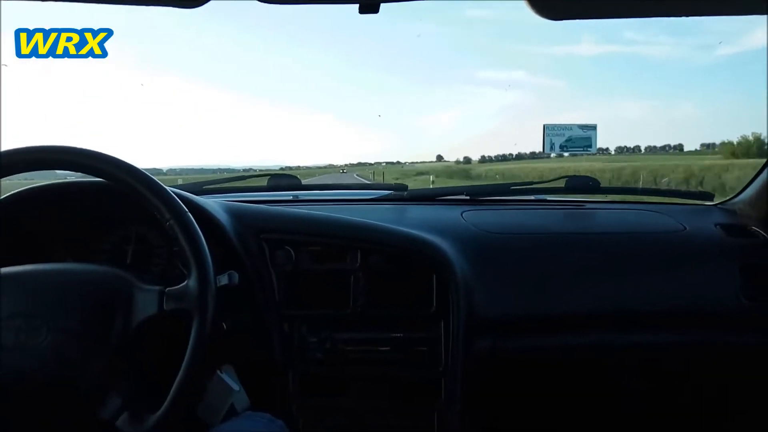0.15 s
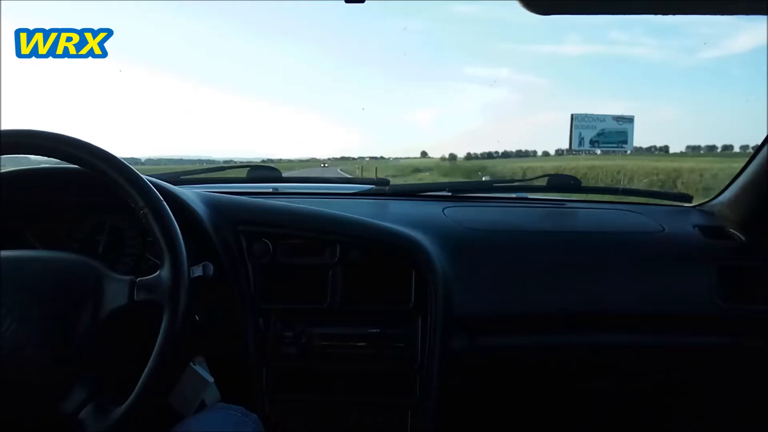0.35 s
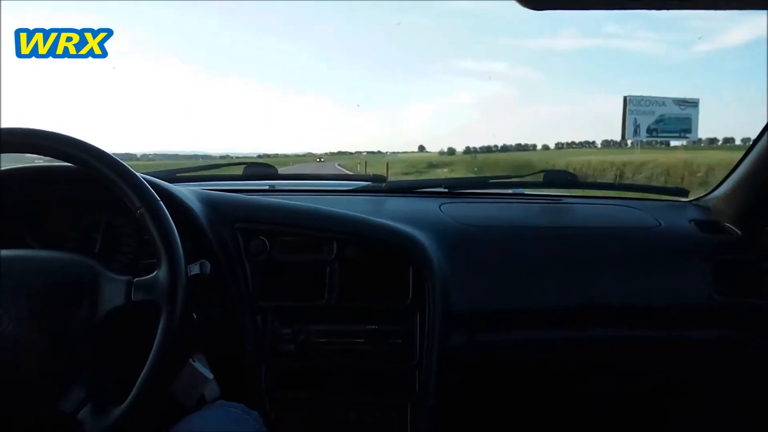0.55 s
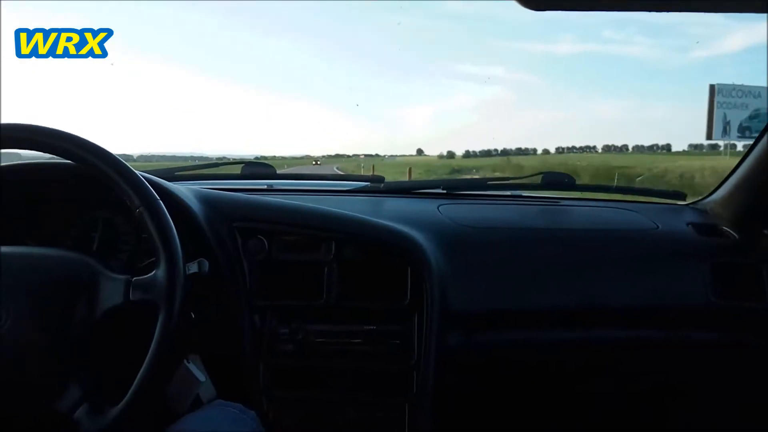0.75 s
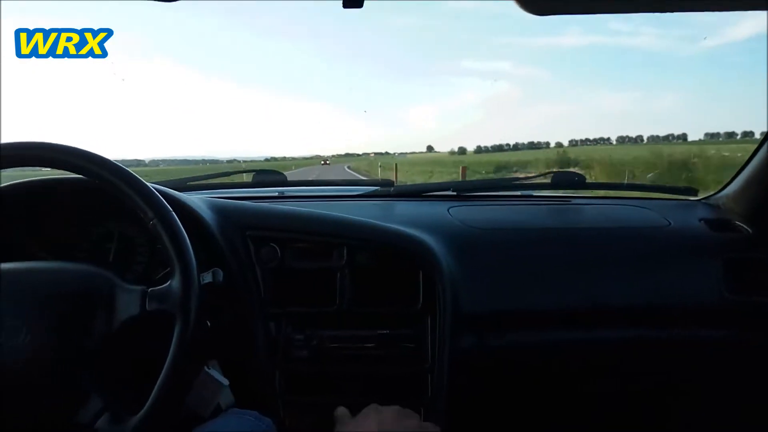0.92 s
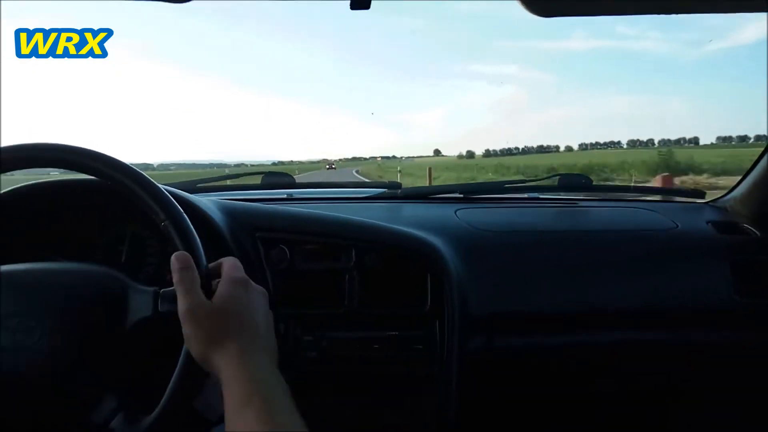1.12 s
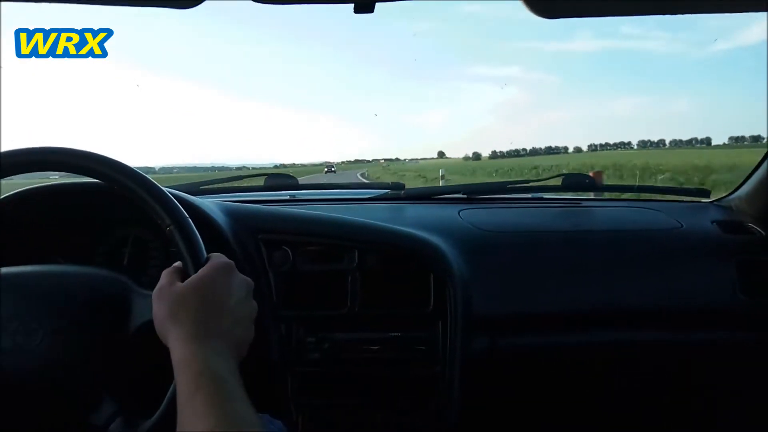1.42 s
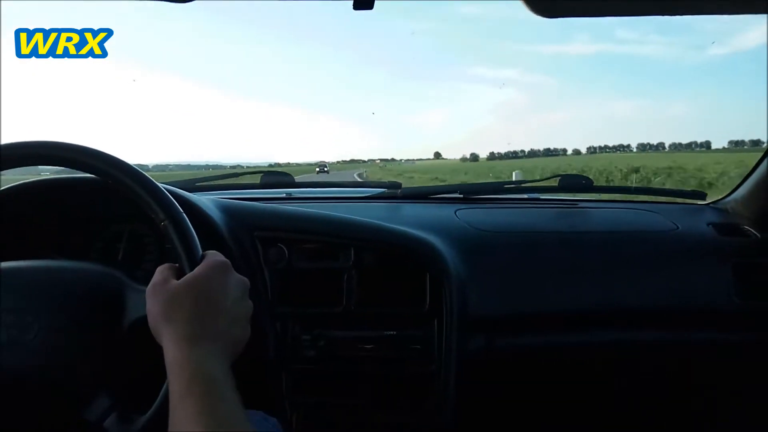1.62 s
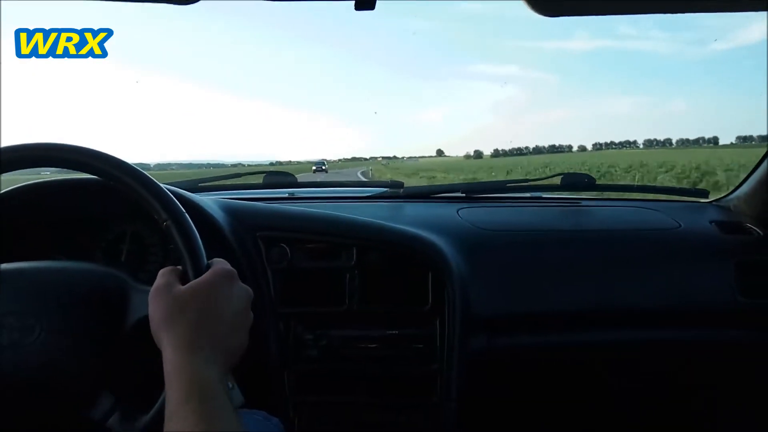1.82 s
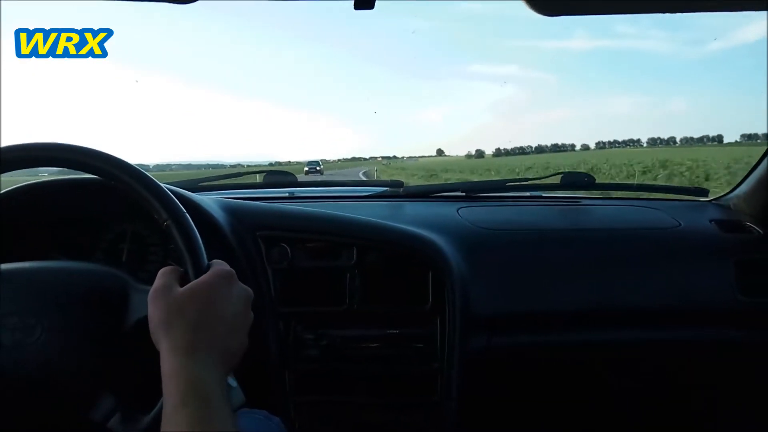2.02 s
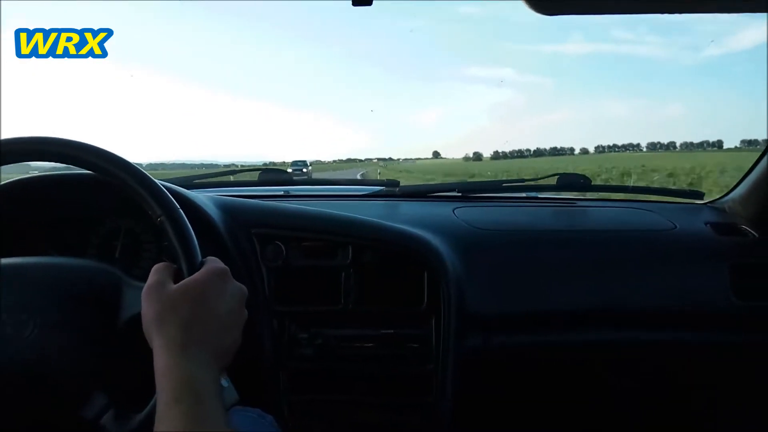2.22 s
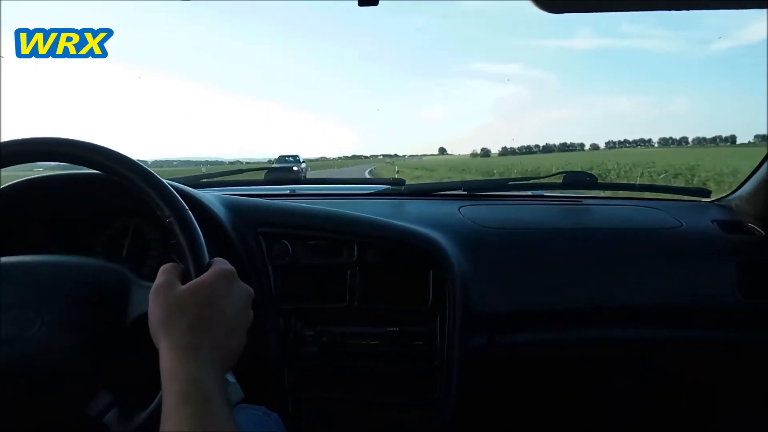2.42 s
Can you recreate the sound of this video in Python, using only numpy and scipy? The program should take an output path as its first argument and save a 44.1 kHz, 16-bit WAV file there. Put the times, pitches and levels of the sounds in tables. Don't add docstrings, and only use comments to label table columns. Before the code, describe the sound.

A turbocharged car engine drones loudly inside the cabin, cuts for a gear change with a dull thump and a short air hiss, then pulls again at a lower pitch over road rumble and faint wind.

```python
import sys
import numpy as np
from scipy import signal
from scipy.fft import rfft, irfft, next_fast_len
from scipy.io import wavfile
from scipy.ndimage import uniform_filter1d, map_coordinates

SR = 44100
rng = np.random.default_rng(int(sys.argv[2]) if len(sys.argv) > 2 else 0)


def volts_from_db(level):
    exponent = np.asarray(level, float) / 20
    return 10 ** exponent


def wav_record(signal):
    frames = np.transpose(np.atleast_2d(signal))
    bounded = np.clip(frames, -1, 1)
    quanta = np.round(bounded * 32767).astype(np.int16)
    wavfile.write(sys.argv[1], SR, quanta)


N = 112896
TIME = np.arange(N) / SR
LAG_S = 0.0004


def unit(x):
    return x / np.sqrt(np.mean(x ** 2) + 1e-20)


def along(hz, f, v):
    return np.interp(np.log(hz + 1), np.log(np.asarray(f) + 1), v)


def curves(rows):
    s, *cols = np.transpose(rows)
    return [np.interp(TIME, s, c) for c in cols]


def wobble(rate_hz):
    knots = rng.standard_normal(int(N * rate_hz / SR) + 4)
    return map_coordinates(knots, [TIME * rate_hz])


def rush(spectrum, patchy_db, peaks=(), lag_s=0):
    # (frequency [Hz], correlation [-1 to 1])
    alike = [(60, 1), (200, .92), (420, 0.74), (700, 0.51), (1000, 0.37), (1400, -0.46), (3100, 1),
             (6800, 0.19)]
    # (frequency [Hz], left minus right [dB])
    lean = [(60, 0.5), (110, -2.5), (200, -1), (380, 0), (700, -2), (1290, 4.5), (2380, -1), (4400, -0.5),
            (8120, -7), (15000, -0.5)]
    z = signal.stft(rng.standard_normal((2, N)), nperseg=512)[2]
    patches = uniform_filter1d(rng.standard_normal(z.shape[1:]), size=6, axis=0)
    patches = uniform_filter1d(patches, size=12, axis=1)
    pair = signal.istft(z * volts_from_db(patchy_db * unit(patches)), nperseg=512)[1][:, :N]

    m = next_fast_len(N + 8192)
    hz = np.fft.rfftfreq(m, 1 / SR)
    gain_db = along(hz, *np.transpose(spectrum))
    for centre_hz, width_hz, db in peaks:
        gain_db = gain_db + db / (1 + (2 * (hz - centre_hz) / width_hz) ** 2)

    late = (hz > 900) & bool(lag_s)
    direct = 0.35 / (1 + (hz / 2900) ** 8)
    likeness = np.where(late, direct, along(hz, *np.transpose(alike)))
    turn = np.arccos(np.clip(likeness, -1, 1)) / 2
    mid, side = rfft(pair, m) * [np.cos(turn), np.sin(turn)]
    tilt = volts_from_db(along(hz, *np.transpose(lean)) / 2) * np.exp(-1j * np.pi * hz * lag_s * late)
    stereo = np.array([(mid + side) * tilt, (mid - side) / tilt])
    return unit(irfft(volts_from_db(gain_db) * stereo, m)[:, :N])


def engine():
    # (time [s], firing rate [Hz], boom of the firing order [dB], throttle [0-1])
    drive = [(0, 164.4, -12, 0.99), (.45, 165.8, -10.5, 0.99), (.485, 165, -20, 0.34),
             (.55, 160.3, -21.5, 0.5), (.59, 156.4, -10, 0.2), (.66, 154.7, -14.5, 1),
             (.71, 148.6, -22.5, .1), (.77, 148, -7.5, 0.1), (.95, 136.2, -9, .05),
             (1.08, 129.9, -9.5, 0.3), (1.145, 129, -8.5, .1), (1.18, 130, -20.5, 0.31),
             (1.22, 133, -9.5, 0.67), (1.3, 131.2, -11.5, 0.82), (1.6, 131.5, -10.5, 0.88),
             (2.0, 132, -9.5, 0.93), (2.56, 132.5, -9, 0.97)]
    # (frequency [Hz], level [dB], left minus right [dB], left lead [rad])
    cabin = [(132, -1, -0.7, -0.17), (165, -9, -0.5, 0.68), (250, -11, 3.5, 0.19), (339, -10.5, -3, 0.41),
             (367, -26, -9, 0.96), (550, -12, -1.5, 0.096), (695, -19.5, 3.5, 0.85),
             (837, -31.5, -7.5, -.3), (1033, -46, 1, 0)]
    pulse = [(2, 1.3), (3, 1.4), (4, -.5), (5, 3), (6, 2.6)]
    # (order [firing rate], level at open throttle [dB])
    halves = [(.5, -29.5), (1.5, -29.5), (4.5, -37), (5.5, -38), (6.5, -45)]
    # (frequency [Hz], level [dB per Hz])
    roar_spectrum = [(120, -38), (200, 4), (330, -0.5), (600, -9), (900, -8), (1600, -25.5), (2600, -39),
                     (6000, -120)]
    hz, boom_db, throttle = curves(drive)
    shut = 1 - throttle
    turn = 2 * np.pi * np.cumsum(hz) / SR + 0.05 * wobble(30)
    f, level_db, lean_db, lead_rad = np.transpose(cabin)
    side = np.array([[0.5], [-0.5]])

    shut_db = -24 * shut
    orders = [(1, 0.0065, boom_db)]
    for k, phase in pulse:
        orders.append((k, phase, -9.5 + shut_db - 6 * (k - 2) * shut))
    tone = 0
    for k, phase, db in orders:
        heard_db = along(k * hz, f, level_db) + side * along(k * hz, f, lean_db)
        gain = volts_from_db(db + heard_db - 0.14 * wobble(25.08))
        tone = tone + gain * np.cos(k * turn + phase + side * along(k * hz, f, lead_rad))

    uneven_db = shut_db + 0.2 * (hz - 165)
    for k, db in halves:
        tone = tone + volts_from_db(uneven_db + db + 2.9 * wobble(19)) * np.cos(k * turn + side * (k - 0.5))

    roar_db = -30 - 7 * shut + 0.2417 * (hz - 132)
    gate = 1 + 0.18 * np.cos(turn)
    roar = volts_from_db(roar_db) * gate * rush(roar_spectrum, patchy_db=0.7, lag_s=-LAG_S)
    return np.sqrt(2) * tone + roar


def thump():
    start_s, level_db, boom_hz, t60_s, rise_s = 0.465, -1, 98.4, 0.15, 0.007
    t = np.clip(TIME - start_s, 0, None)
    envelope = volts_from_db(level_db - 60 * t / t60_s) * (1 - np.exp(-t / rise_s))
    return envelope * np.sin(2 * np.pi * boom_hz * t)


def valve():
    # (time [s], level [dB], attack [s], hold [s], sag [dB/s], t60 [s])
    vents = [
        (.41, -30, .1, .24, 9, .7),
        (1.25, -45, .03, .04, 10, .3),
    ]
    # (frequency [Hz], level [dB per Hz])
    vent_spectrum = [(150, -33.5), (330, -0.5), (800, -10.5), (2300, -4.5), (2550, -11.5), (5000, -13),
                     (10000, -24), (13600, -39.5)]
    # (frequency [Hz], width [Hz], level [dB])
    pipe = [(3950, 300, 4), (4550, 200, 5), (12200, 400, 1.5), (14800, 700, 16)]
    # (frequency [Hz], width [Hz], level [dB], rise [s], t60 [s], end [s])
    sings = [(2056, 320, -37, 0.18, 10, 1.17), (2220, 220, -37, 0.18, 6.6, .77),
             (4100, 770, -36.5, .11, 1.3, .8)]
    opening = 0
    for start_s, db, rise_s, hold_s, sag, t60_s in vents:
        held = TIME - start_s - rise_s
        fall_db = sag * np.clip(held, 0, hold_s) + 60 * np.clip(held - hold_s, 0, None) / t60_s
        opening = opening + volts_from_db(db - fall_db) * np.clip((TIME - start_s) / rise_s, 0, 1) ** 0.73
    hiss = opening * volts_from_db(0.7 * wobble(60)) * rush(vent_spectrum, patchy_db=2.2, peaks=pipe, lag_s=LAG_S)

    since = np.clip(TIME - vents[0][0], 0, None)
    for hz, width_hz, db, rise_s, t60_s, end_s in sings:
        rise = np.clip(since / rise_s, 0, 1) ** 2
        stop = np.clip((end_s - TIME) / 0.05, 0, 1)
        shape = rise * stop * volts_from_db(db - 60 * since / t60_s)
        skirt = [(hz / 4, -120), (hz, 0), (hz * 4, -120)]
        band = rush(skirt, patchy_db=0.0, peaks=[(hz, width_hz, 20)], lag_s=LAG_S)
        hiss = hiss + shape * volts_from_db(1.2 * wobble(20)) * band
    return hiss


def whistle():
    # (time [s], frequency [Hz], level [dB])
    turbine = [
        (1.5, 8600, -78),
        (1.56, 8850, -61),
        (1.66, 9350, -55),
        (1.72, 9700, -72),
        (2.02, 8700, -78),
        (2.07, 8700, -56),
        (2.25, 8760, -56),
        (2.56, 8770, -55),
    ]
    hz, db = curves(turbine)
    phase = 2 * np.pi * np.cumsum(hz + 60 * wobble(60)) / SR
    tone = volts_from_db(db + 1.7 * wobble(30)) * np.sin(phase)
    return tone * volts_from_db([[-10], [0]])


def road():
    # (frequency [Hz], level [dB], phase wander [rad])
    hums = [(37.4, -35, 1.7), (65.2, -33, 0.6), (88.1, -26, 0.58)]
    # (frequency [Hz], level [dB per Hz])
    rumble_spectrum = [(12, -60), (30, -14.5), (50, -14.5), (65, -9.5), (88, -2.5), (110, -3), (170, -10),
                       (400, -120)]
    # (frequency [Hz], level [dB per Hz])
    body_spectrum = [(100, -35), (170, -0.5), (300, -6), (500, -10.5), (900, -18), (1500, -19.5),
                     (2400, -40), (6000, -120)]
    hum = 0
    for hz, db, wander_rad in hums:
        phase = 2 * np.pi * hz * TIME + wander_rad * wobble(12)
        hum = hum + volts_from_db(db + 1.6 * wobble(9.8)) * np.sin(phase)
    rumble = volts_from_db(-22) * rush(rumble_spectrum, patchy_db=-4.0)
    body = volts_from_db(-23.5) * rush(body_spectrum, patchy_db=0.37)
    return hum + rumble + body


def wind():
    # (frequency [Hz], level [dB per Hz])
    wind_spectrum = [(700, -57.5), (1500, -5.5), (2200, -6.5), (2700, -11), (6500, -19.5), (8000, -28),
                     (10000, -27.5), (13000, -42)]
    peaks = [(6560, 150, 4), (4570, 160, 4), (12750, 71, 4.8), (14700, 1200, 9)]  # Hz, width Hz, dB
    lull_s, lull_width_s, lull_db = 1.17, 0.06, -3
    lull = lull_db * np.exp(-((TIME - lull_s) / lull_width_s) ** 2)
    gusts_db = 0.34 * wobble(6.2) + 0.47 * wobble(22)
    return volts_from_db(-39.5 + lull + gusts_db) * rush(wind_spectrum, patchy_db=0.63, peaks=peaks, lag_s=LAG_S)


def scene():
    return engine() + thump() + valve() + whistle() + road() + wind()


def low_pass(x):
    return signal.sosfilt(signal.butter(12, 16820, fs=SR, output="sos"), x)


def record(dry):
    soft = dry / (1 + np.abs(dry / 0.64) ** 5) ** (1 / 5)
    start_s, stop_s = 0.012, 0.006
    soft = soft * np.clip(np.minimum(TIME / start_s, TIME[::-1] / stop_s), 0, 1)
    m = next_fast_len(N + 8192)
    passed = np.fft.rfftfreq(m, 1 / SR) < 15520
    band = irfft(rfft(soft, m) * passed, m)[:, :N]
    return low_pass(band)


dry = scene()
out = record(dry)
wav_record(out)
```